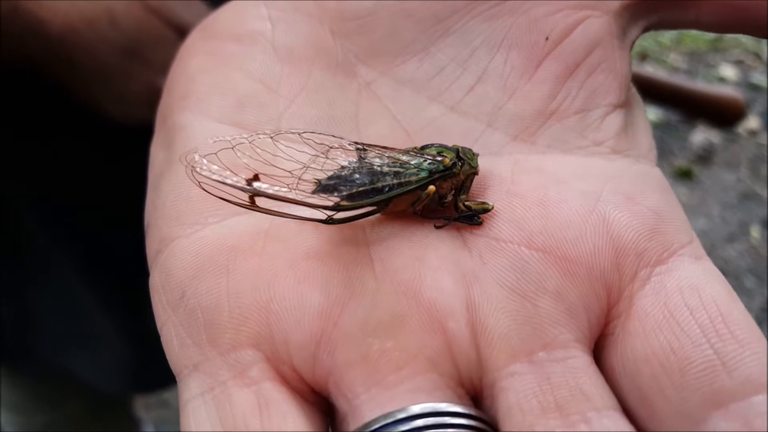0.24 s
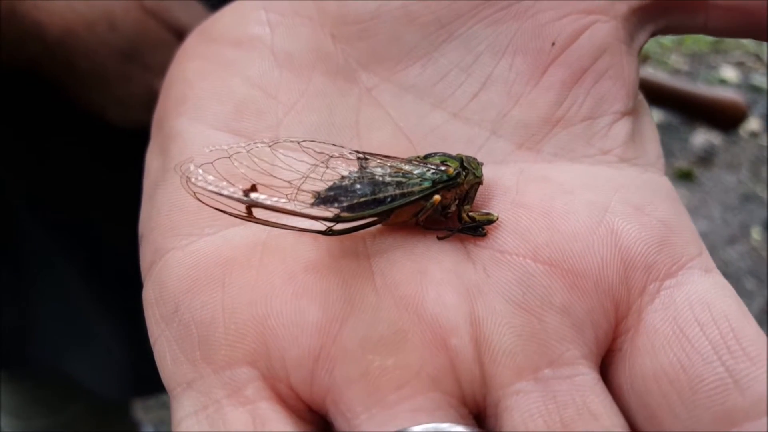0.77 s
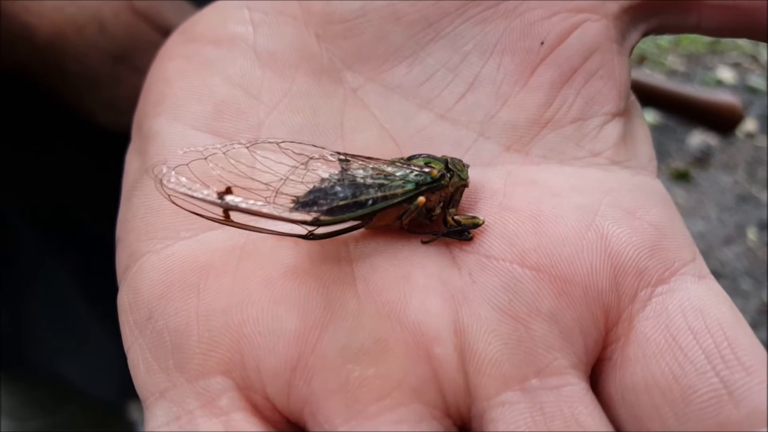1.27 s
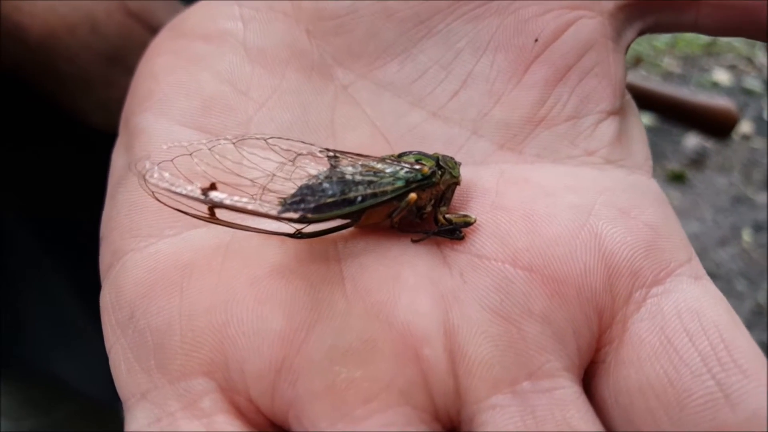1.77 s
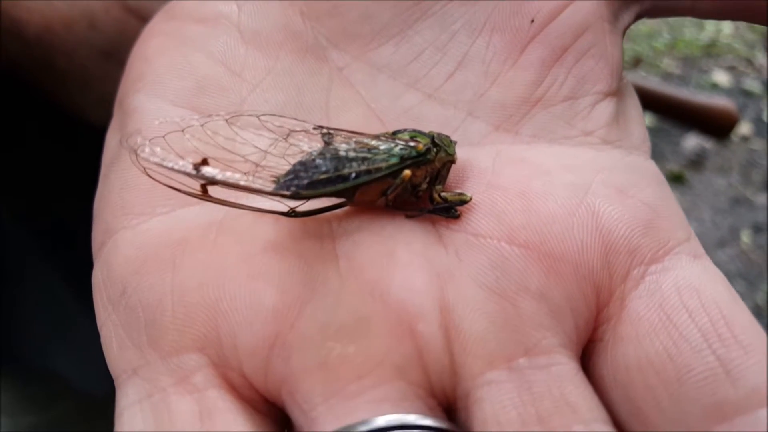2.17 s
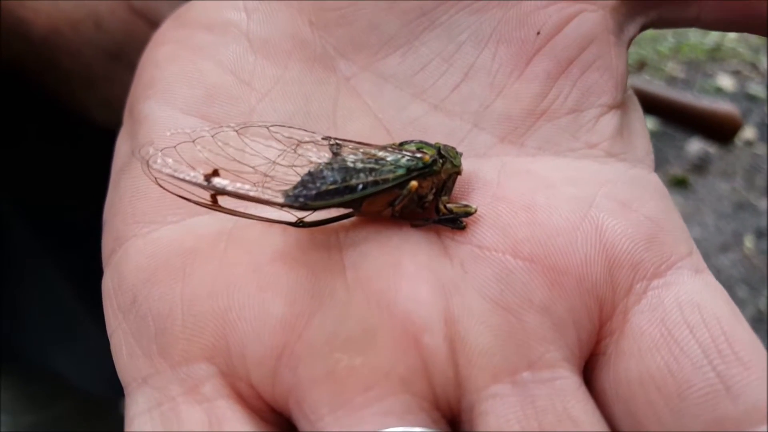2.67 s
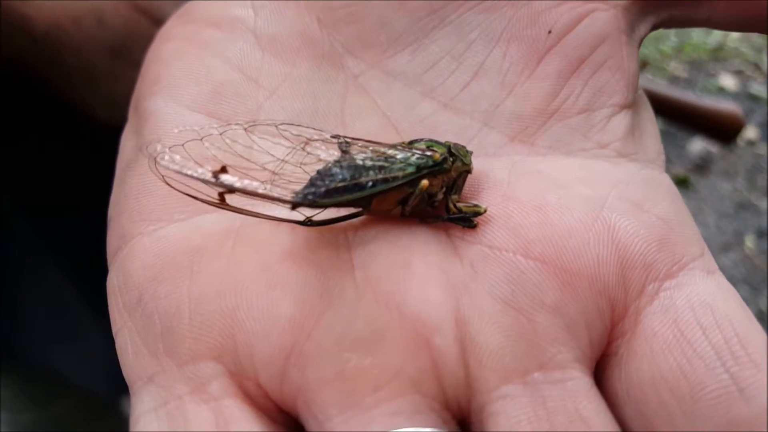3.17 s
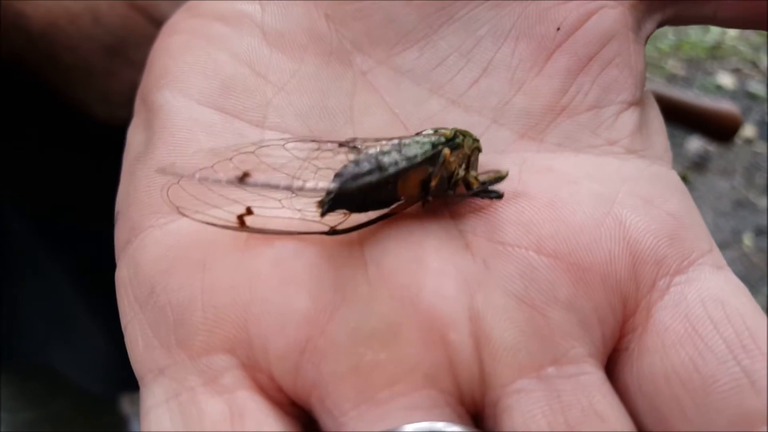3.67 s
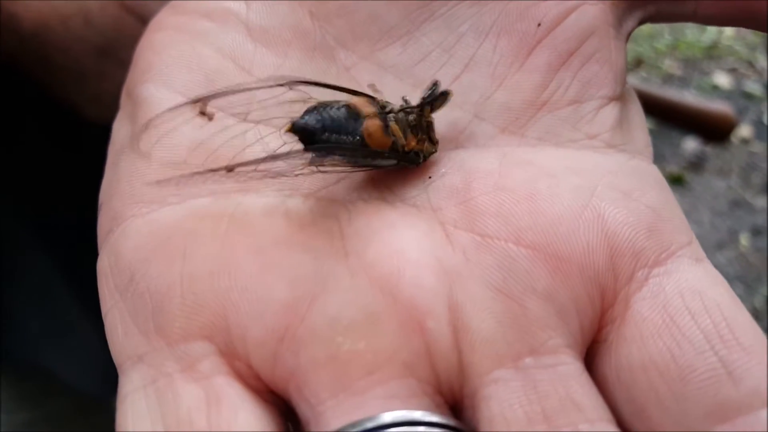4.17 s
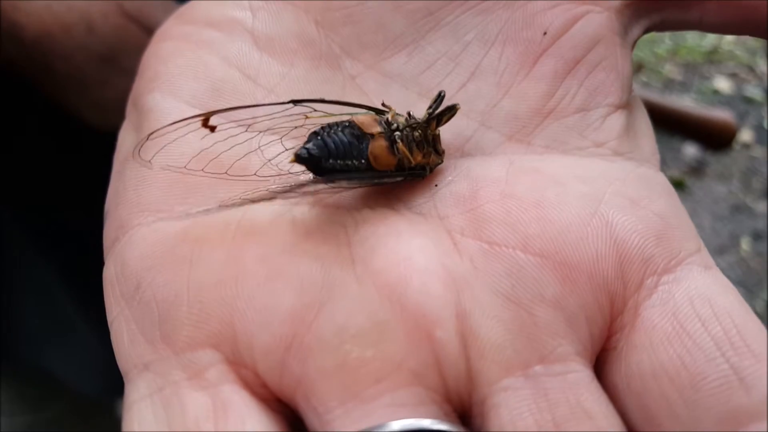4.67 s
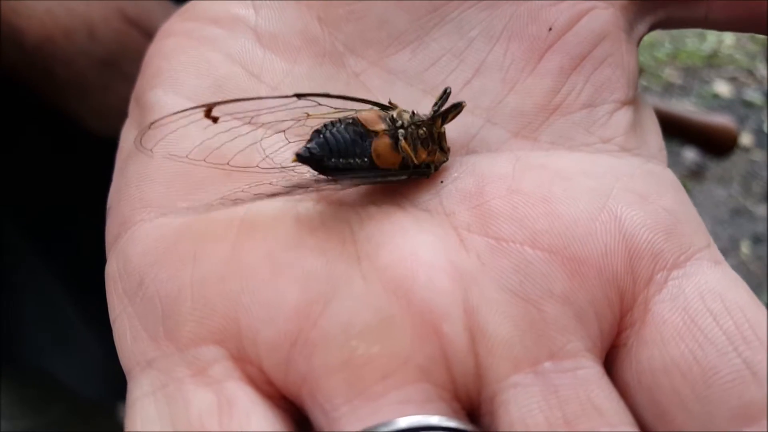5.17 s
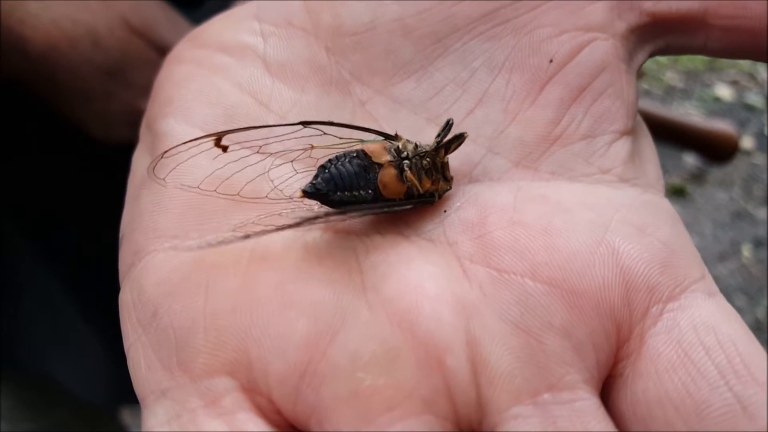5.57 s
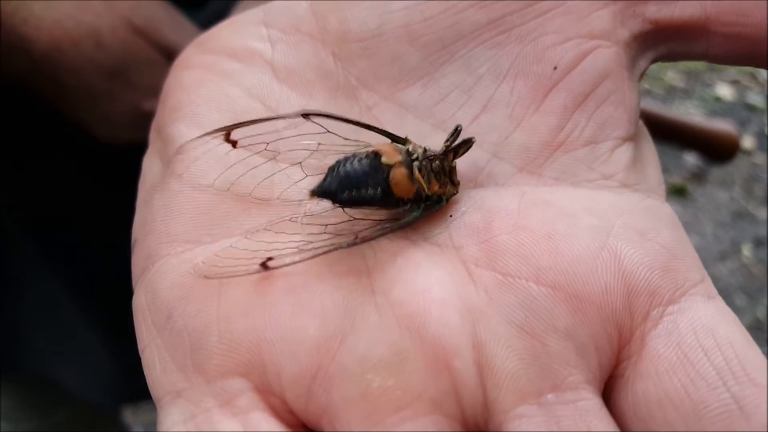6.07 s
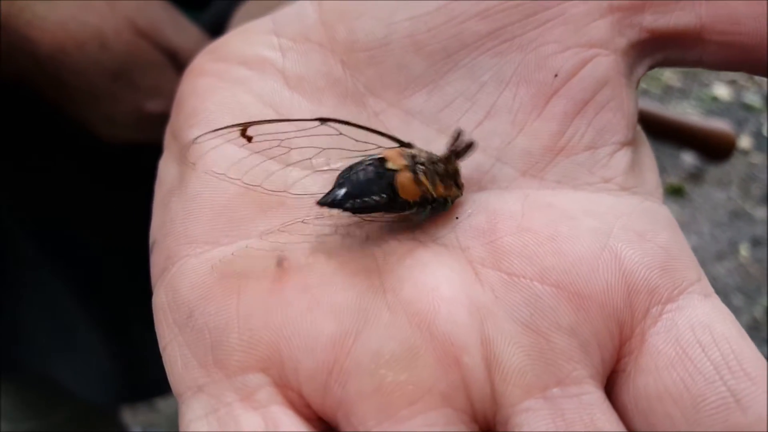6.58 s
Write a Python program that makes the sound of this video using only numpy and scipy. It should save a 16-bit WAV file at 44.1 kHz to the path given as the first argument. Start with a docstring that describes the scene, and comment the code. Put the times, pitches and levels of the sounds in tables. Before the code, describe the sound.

From the start a cicada, very close, clicks at an even pace of about nine per second. Each click is a dry, bright cluster of about six tiny snaps within some twenty milliseconds, like a miniature ratchet, ringing mostly around five kilohertz and above. It sits nearer the left, with small dull pops on some clicks and a very faint outdoor echo. A small hollow tick falls at about 1.6 s. From 3.2 s the rhythm becomes irregular, with some clicks bunched together; around 4.4 to 4.6 s they weaken and pop more bluntly. Clicking stops from 4.6 to 5.1 s, leaving soft rumble and hiss and a faint far tone near 4.8 s. It resumes at 5.1 s, somewhat softer and uneven, a nearly buried tick at 5.5 s, then steadies and strengthens from 6.4 s as the background air rises slightly, continuing to the end near 6.8 s.

```python
"""Outdoors, on an open palm: a cicada close to a camera's two microphones clicks about nine times a second, pausing once.
Each click is one pull on the tymbal: six ribs buckle in turn, and every snap briefly rings the membrane and
the hollow abdomen, whose tone shifts as the insect turns. Snaps bounce off the palm; some pop the left microphone.
The surroundings return a faint echo; two dry ticks and a faint far tone sit over a quiet outdoor background.
The camera's gain control ducks under the clicks."""
import sys
import numpy as np
from scipy import signal
from scipy.fft import rfft, irfft
from scipy.io import wavfile
from scipy.ndimage import uniform_filter1d, minimum_filter1d

SR = 44100
rng = np.random.default_rng(int(sys.argv[2]) if len(sys.argv) > 2 else 0)


def put_to_file(sound):
    """Save the sound as 16-bit audio at rate SR, in the file named by the first command-line argument."""
    columns = np.atleast_2d(sound).T  # one column per channel
    safe = np.clip(columns, -1, 1)
    whole_steps = np.round(safe * 32767)
    wavfile.write(sys.argv[1], SR, whole_steps.astype(np.int16))


N = 301644
TIME = np.arange(N) / SR  # s
FREQ = np.arange(N // 2 + 1) * SR / N  # Hz

# Pulls of the tymbal. Each row: start in seconds, strength in dB, snap of the last rib in dB
# (only a deep pull reaches that rib).
PULLS = [(0.0778, 1, -10), (0.1834, 3, 10), (0.2934, 3, 8), (0.3987, 1, -2), (0.5065, 2, -8),
         (0.6144, 4, 3), (0.722, -2, 4), (0.8307, -1, 5), (0.9383, 1, -2), (1.0458, 3, 4), (1.1561, 3, -4),
         (1.2659, 3, -3), (1.3745, 5, 7), (1.4832, 5, 11), (1.589, 0, 1), (1.6969, 2, -7), (1.8017, -5, 3),
         (1.9076, 2, -6), (2.0097, -2, 0), (2.1141, 4, 4), (2.2201, -3, 2), (2.332, -1, 1), (2.4408, -3, 2),
         (2.55, -3, 2), (2.66, -2, 1), (2.7677, 2, -10), (2.8772, 2, -9), (2.9866, 2, -8), (3.0944, 2, 5),
         (3.1777, -1, -8), (3.2726, 3, 10), (3.3172, 3, 14), (3.3505, 3, 12), (3.5041, 3, 3),
         (3.5629, -8, 2), (3.6959, 1, -9), (3.8049, 4, 1), (3.8404, 2, 14), (3.9468, -2, -14),
         (4.0656, -2, -11), (4.1144, -1, -23), (4.2067, -2, -14), (4.2492, 0, 11), (4.3533, 0, 3),
         (4.422, -8, -4), (4.4925, -12, -4), (4.6027, -9, -3), (5.1196, -7, -1), (5.2615, -6, 1),
         (5.3859, 0, 0), (5.5079, -3, -12), (5.5893, -6, -6), (5.6935, 1, 3), (5.8147, 0, -1),
         (5.9354, -1, -9), (6.0009, -6, -4), (6.0945, 0, -5), (6.207, -1, -11), (6.3153, -14, -9),
         (6.417, 3, 9), (6.5234, 0, 6), (6.6312, -4, -5), (6.7351, 1, 9)]
# Resonances of tymbal and abdomen. Each row: pitch in Hz, time constant in ms.
# The third is the abdomen, whose pitch is taken from POSE instead.
BODY_RESONANCES = [(560, 0.16), (3700, 0.11), (5200, 0.29), (6250, 0.16), (7400, 0.25), (10400, 0.17),
                   (14000, 0.071)]
# The six ribs in order, one row each: how hard the rib rings each body resonance, in dB, one column per resonance.
RIB_RINGS = [(-28.5, -27, -14, -29, -10, -21.5, -24.5), (-22, -28.5, -3.5, -7, -85, -13.5, -31.5),
             (-34.5, -30.5, -14.5, -27.5, -15.5, -23.5, -35.5), (-28.5, -36.5, -10, -17.5, -16, -19, -20.5),
             (-33, -31, -9.5, -19, -22, -22.5, -52.5), (-38, -50.5, -18, -25.5, -30.5, -30, -46)]
# When ribs three to six buckle, in ms after the second.
LATER_RIBS_MS = [3.33, 5.67, 7.5, 12.45]
# The body slowly turns and tenses. Each row: time in seconds, abdomen resonance in Hz, abdomen in dB,
# middle resonances in dB, upper resonance in dB, low thump in dB, first to second rib in ms,
# extra left minus right in dB.
POSE = [(0, 5110, -2, 2.1, 6.5, 1, 3.73, -4), (1.4, 5310, 0.3, 1, 5.5, -2.5, 3.74, -3.3),
        (2.8, 5050, -0.5, 1.5, 4.3, -2, 4.05, -0.5), (3.4, 4960, 0, 0.8, 3, 2.5, 4, -3),
        (4.0, 4960, -1, -0.3, 0, -0.5, 4.36, -4.5), (4.6, 4880, 2, 4, 4, 4, 3.67, -2.5),
        (5.2, 5120, 2, 4, 2.5, -6, 4.05, -2), (5.9, 5090, 0, -0.5, 6, 1.5, 4.55, -5.5),
        (6.35, 5160, -5.5, 4, 8, 5.5, 4.43, -7.5), (6.84, 5030, -9.5, 1.8, 7.5, 5.5, 3.7, -6.5)]
# The right microphone is further off and sees the body from another side: one value in dB per resonance.
RIGHT_SHADE_DB = [-14.5, -22, -15.5, -6.5, -3.5, -13.5, -8]
# Bounces of each snap off the palm and the fingers. Each row: typical delay in ms, level in dB.
PALM_BOUNCES = [(0.928, -19), (1.448, -16.5), (2.7, -15.5)]
# What the insect sends out to the surroundings, against the close sound. Each row: pitch in Hz, level in dB.
FAR_COLOUR = [(3900, -6), (4700, 0.5), (5500, -4), (6500, 2), (7200, 0), (8300, 9), (9200, -3.5),
              (14000, -4.5)]
# Dull pops where a snap overloads the left microphone. Each row: time in seconds, relative peak in dB.
POPS = [(0.3987, -20), (0.5066, -16), (0.9388, -19.5), (1.046, -16), (1.1564, -14), (1.266, -16),
        (1.9078, -18.5), (2.01, -23), (2.4411, -30.5), (2.5503, -25), (4.4262, -8.5), (4.4961, -15.5),
        (4.6058, -3.5), (5.1199, -29), (5.2656, -11.5), (5.507, -21), (5.5896, -27.5), (6.2073, -19.5),
        (6.434, -18), (6.5404, -26.5), (6.753, -20.5)]
# Small dry ticks near the camera. Each row: start in seconds, level in dB.
TICKS = [(1.6334, -8.5), (5.4729, -29.5)]
# What a tick rings with. Each row: pitch in Hz, time constant in ms, level in dB.
TICK_RESONANCES = [(556, 1, -26.5), (1120, 0.35, -7.5), (1850, .6, -12.5), (2950, 0.28, -5),
                   (3380, 0.43, -15)]
# Outdoor air over time. Each row: time in seconds, then relative levels of rumble, murmur and hiss, each in dB.
AIR_LEVELS = [(0.0, -67.5, -75, -68), (0.91, -64, -73, -67), (3.07, -68, -74.5, -71.5),
              (4.25, -70.5, -69, -72.5), (5.31, -60, -74, -66.5), (5.72, -66.5, -71, -68),
              (6.44, -57, -64.5, -61.5), (6.84, -56.5, -64, -63)]
# Spectrum of the outdoor air. Each row: pitch in Hz, relative level per Hz in dB.
AIR_COLOUR = [(15, 2), (25, -5.5), (69, 2.5), (122, -4), (188, -5), (552, -19.5), (970, -14), (1750, -24),
              (2300, -26), (4260, -32.5), (8350, -36.5), (11200, -40), (13500, -22.5), (15500, -27.5)]

RIGHT_LAG_MS = 0.33  # typical extra travel time to the right microphone
EARLY_SHARE = 0.083  # share of the pull's strength that the first two ribs follow
DETUNE = 0.024  # relative spread of the resonances from snap to snap
TOP_HZ = 16200  # upper edge of the camera's sound


def tymbal(slip_ms=0.059, rib_scatter_db=1.0, ring_scatter_db=1.58, lag_scatter_ms=0.024, bounce_scatter=0.062):
    """Six ribs snap per pull, varying in time, pitch and strength; both microphones also hear the palm bounces."""
    out = np.zeros((2, N))
    body_hz, tau_ms = np.transpose(BODY_RESONANCES)
    for s, pull_db, last_db in PULLS:
        abdomen_hz, abdomen_db, mid_db, upper_db, thump_db, gap_ms, pan_db = read(POSE, s)
        pose_db = np.array([thump_db, 0, abdomen_db, mid_db, mid_db, upper_db, upper_db / 2])
        snaps_ms = np.r_[0, gap_ms, gap_ms + np.array(LATER_RIBS_MS)]
        early_db = EARLY_SHARE * pull_db
        forces_db = [early_db, early_db, pull_db, pull_db, pull_db, last_db]
        for ms, force_db, rib_db in zip(snaps_ms, forces_db, RIB_RINGS):
            slip, force, lag = rng.standard_normal(size=3)
            loose = ms > gap_ms  # the later ribs give way less predictably
            hz = np.r_[body_hz[:2], abdomen_hz, body_hz[3:]]
            hz = hz * (1 + DETUNE * rng.standard_normal(len(hz)))
            snap_db = np.array(rib_db) + force_db + pose_db
            snap_db = snap_db + loose * rib_scatter_db * force
            snap_db = snap_db + ring_scatter_db * rng.standard_normal(len(hz))
            left_view = (0, 0)
            right_view = (RIGHT_LAG_MS + lag_scatter_ms * lag, np.array(RIGHT_SHADE_DB) - pan_db)
            for microphone, (lag_ms, view_db) in zip(out, [left_view, right_view]):
                direct_ms = ms + loose * slip_ms * slip + lag_ms
                paths = [(0, 0)]
                for delay_ms, bounce_db in PALM_BOUNCES:
                    paths.append((delay_ms * (1 + bounce_scatter * rng.standard_normal()), bounce_db))
                for path_ms, path_db in paths:
                    arrival_s = s + (direct_ms + path_ms) / 1000
                    add_rings(microphone, arrival_s, hz, tau_ms, snap_db + view_db + path_db)
    return out


def cicada(echo_left_db=-3):
    """The close clicks, and a faint diffuse echo of the left microphone's clicks from the surroundings."""
    near = tymbal()
    sent_out = shape(near[0], colour(FAR_COLOUR))
    far = echoes(sent_out, db=-28, t60_s=0.24, delay_s=0.012)
    return near + far * undb([[echo_left_db], [0]])


def pops(width_ms=0.04, gain_db=2, right_db=-26, low_hz=130):
    """Overload pushes out one-sided bumps a fraction of a millisecond wide; the right side gets only a trace."""
    out = np.zeros(N)
    for s, db in POPS:
        i = int(s * SR) + np.arange(-40, 40)
        offset_ms = (TIME[i] - s) * 1000
        out[i] += undb(db + gain_db) * np.exp(-0.5 * (offset_ms / width_ms) ** 2)
    high_pass = signal.butter(1, low_hz, "high", fs=SR, output="sos")
    return np.outer([1, undb(right_db)], signal.sosfilt(high_pass, out))


def tick(tail_db=-19, top_hz=4200):
    """Short rings make dry, hollow ticks with little treble, equally loud on both sides, with a very short tail."""
    out = np.zeros(N)
    for s, db in TICKS:
        for hz, tau_ms, ring_db in TICK_RESONANCES:
            add_rings(out, s, np.array([hz]), np.array([tau_ms]), ring_db + db)
    out = shape(out, 1 / np.sqrt(1 + (FREQ / top_hz) ** 20))
    return out + echoes(out, db=tail_db, t60_s=0.025, delay_s=0.002)


def far_tone(s=4.79, half_s=0.09, hz=598, fall=0.015, db=-68):
    """A faint tone from far off: a sine that falls slightly, unsteady in pitch and level."""
    u = np.clip((TIME - s) / half_s, -1, 1)  # -1 to 1 from start to end
    pitch_hz = hz * (1 - fall * u) + 16 * walk(90)
    level = undb(db + 2 * walk(40)) * np.sqrt(1 - u ** 2)
    return level * np.sin(2 * np.pi * np.cumsum(pitch_hz) / SR)


def background(murmur_gain_db=5, hiss_gain_db=5, alike_hz=400, hiss_hz=3000, flutter_db=2, waver_db=1):
    """Noise shaped like outdoor air: unsteady rumble and murmur, most alike on both sides, under a wide hiss."""
    rumble_db, murmur_db, hiss_db = read(AIR_LEVELS, TIME)
    mid, side = (unit(shape(rng.standard_normal(N), colour(AIR_COLOUR))) for _ in range(2))
    side = shape(side, np.sqrt((FREQ + 0.033 * alike_hz) / (FREQ + alike_hz)))  # narrower in the bass
    both = np.array([mid + side, mid - side])
    low = shape(both, 1 / (1 + (FREQ / hiss_hz) ** 2))
    rumble = shape(low, 1 / (1 + (FREQ / 220) ** 2))
    return (unit(rumble) * undb(rumble_db + flutter_db * walk(19))
            + unit(low - rumble) * undb(murmur_db + murmur_gain_db + waver_db * walk(12))
            + unit(both - low) * undb(hiss_db + hiss_gain_db))


def add_rings(out, s, hz, tau_ms, db, size=180):
    """Add resonances struck at time s: each swells, then dies away; neighbours swing in opposite sense."""
    start = int(s * SR)
    t = np.maximum(np.arange(start, start + size) / SR - s, 0)
    age = t / (tau_ms[:, None] / 1000)  # in time constants
    rings = age * np.exp(-age) * np.sin(2 * np.pi * hz[:, None] * t)
    signs = (-1) ** np.arange(len(hz))
    gain = undb(db) * signs / np.linalg.norm(rings, axis=1)  # dB sets each ring's energy
    room = out[start:start + size]
    room += (gain @ rings)[:len(room)]


def echoes(x, db, t60_s, delay_s):
    """A diffuse decaying noise tail that builds up over a delay, unrelated in the two channels."""
    t = TIME[:SR // 2]
    envelope = undb(-60 * t / t60_s) * (1 - np.exp(-(t / delay_s) ** 2))
    tail = rng.standard_normal((2, len(t))) * envelope
    tail /= np.linalg.norm(tail, axis=1, keepdims=True)
    return undb(db) * signal.fftconvolve(x[None], tail, axes=1)[:, :N]


def undb(db):
    """Decibels to gain."""
    return 10 ** (np.asarray(db) / 20)


def unit(x):
    """Scale to rms 1."""
    return x / np.sqrt(np.mean(x ** 2))


def read(table, t):
    """The columns of a curve at time t."""
    s, *columns = np.transpose(table)
    return [np.interp(t, s, c) for c in columns]


def colour(points):
    """Gain at every frequency from (Hz, dB) points."""
    hz, db = np.transpose(points)
    return undb(np.interp(np.log(FREQ + 1), np.log(hz), db))


def shape(x, gain):
    """Filter by a frequency response."""
    return irfft(rfft(x) * gain, N)


def walk(rate):
    """Random levels, each held 1 / rate seconds, smoothed twice and scaled to rms 1."""
    k = int(SR / rate)
    steps = np.repeat(rng.standard_normal(N // k + 1), k)
    return unit(uniform_filter1d(uniform_filter1d(steps, k), k)[:N])


def held_peak(x, hold_s):
    """The largest swing of either channel within a short window centred on each moment."""
    return -minimum_filter1d(-np.abs(x).max(axis=0), int(hold_s * SR)) + 1e-9


def scene():
    """The insect close by, the small sounds around it and the outdoor air."""
    return undb(3.5) * (cicada() + pops()) + tick() + background() + far_tone()


def record(dry, threshold_db=-40, slope=0.15, hold_s=0.0037, ease_s=0.027):
    """Gain control looks ahead and ducks gently; a fast limiter holds the peaks; deep bass and top are cut."""
    over_db = np.maximum(20 * np.log10(held_peak(dry, hold_s)) - threshold_db, 0)
    ducked = dry * undb(uniform_filter1d(-slope * over_db, int(ease_s * SR)))
    limit_gain = np.minimum(0.36 / held_peak(ducked, 0.002), 1)
    limited = ducked * uniform_filter1d(limit_gain, size=44)  # eased over about 1 ms
    bass_cut = signal.butter(3, 46, "high", fs=SR, output="sos")
    top_cut = signal.ellip(8, 0.2, 70, TOP_HZ, fs=SR, output="sos")
    return signal.sosfilt(top_cut, signal.sosfilt(bass_cut, limited))


dry = scene()
out = record(dry)
put_to_file(out)
```